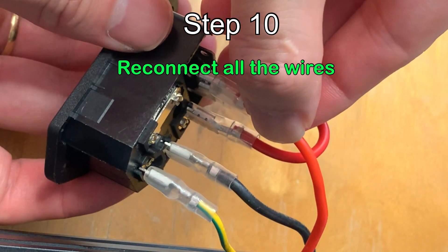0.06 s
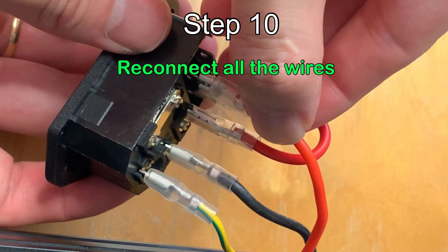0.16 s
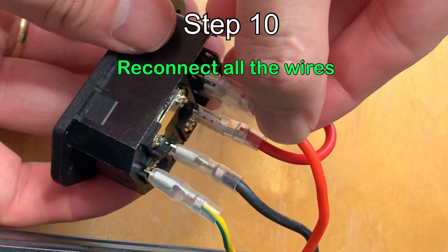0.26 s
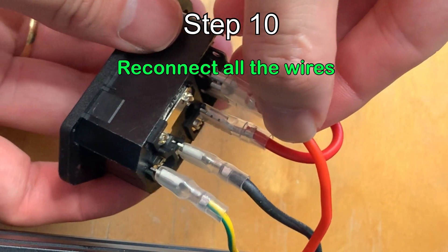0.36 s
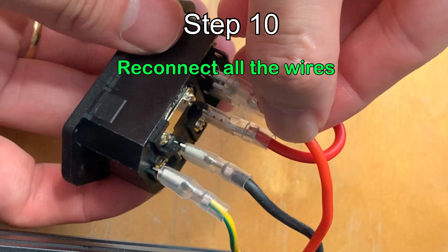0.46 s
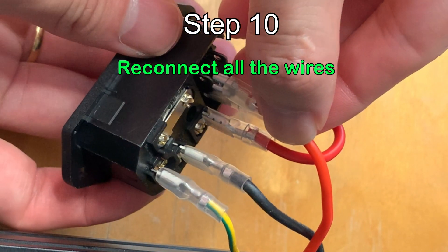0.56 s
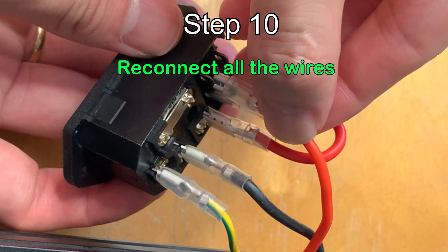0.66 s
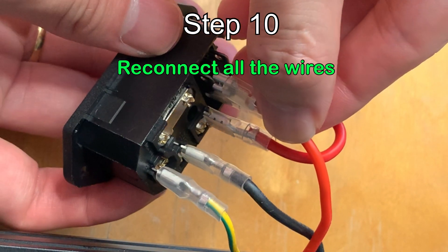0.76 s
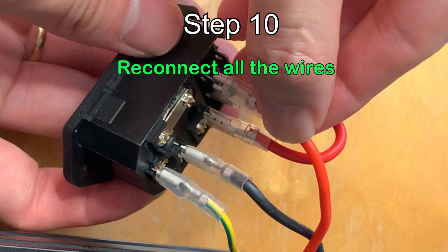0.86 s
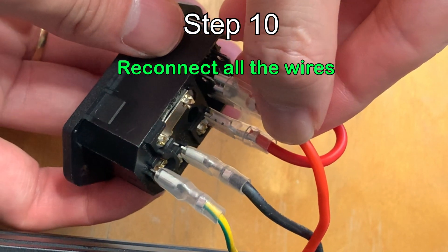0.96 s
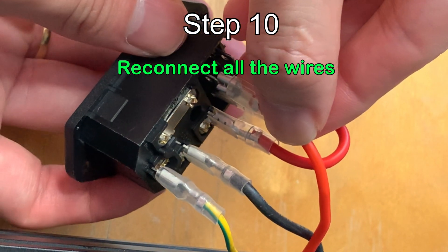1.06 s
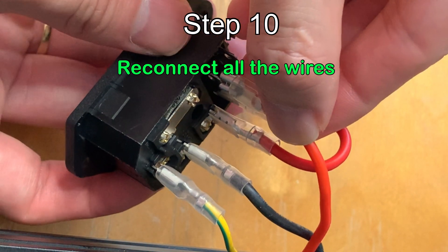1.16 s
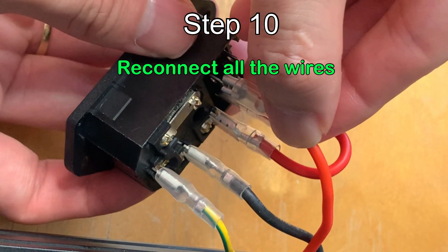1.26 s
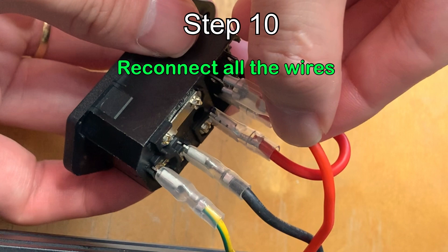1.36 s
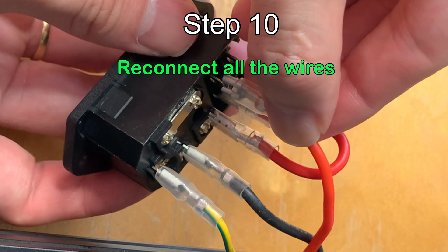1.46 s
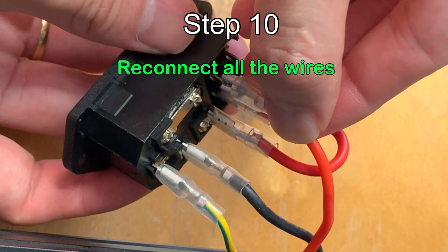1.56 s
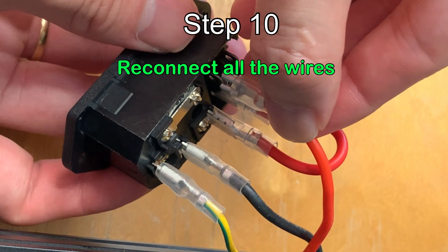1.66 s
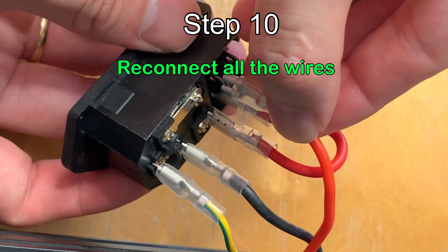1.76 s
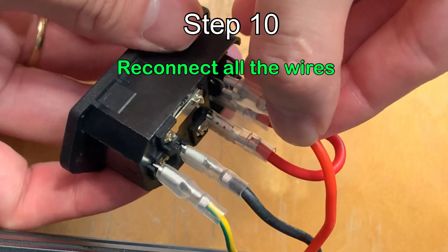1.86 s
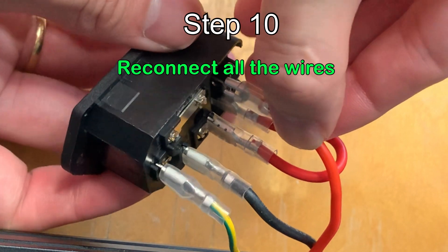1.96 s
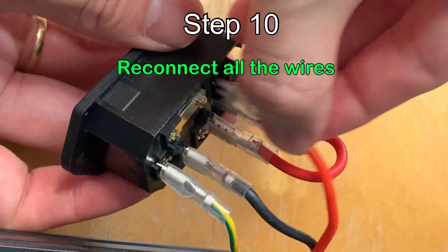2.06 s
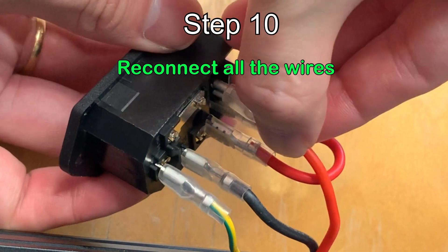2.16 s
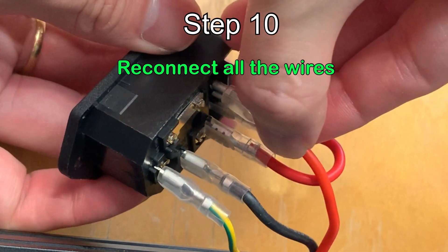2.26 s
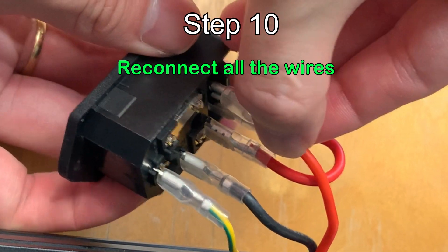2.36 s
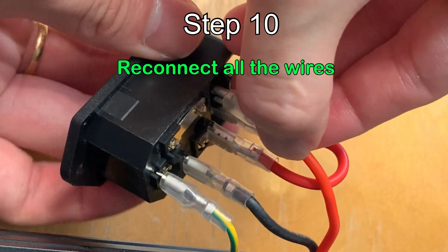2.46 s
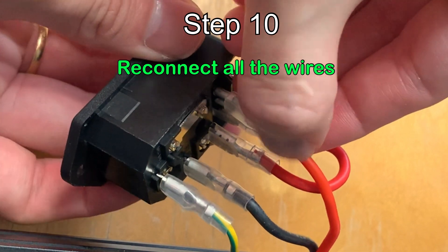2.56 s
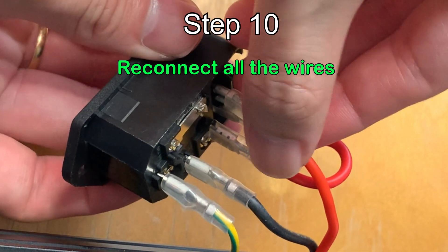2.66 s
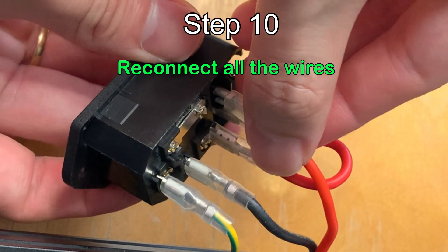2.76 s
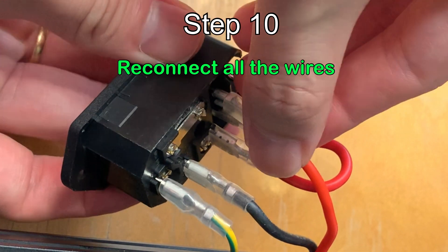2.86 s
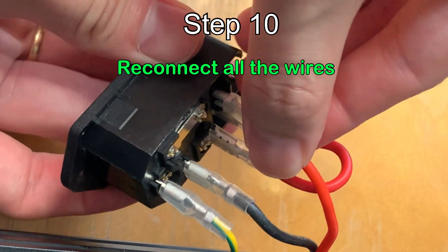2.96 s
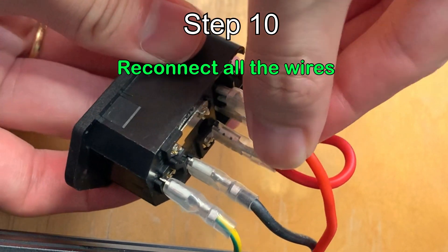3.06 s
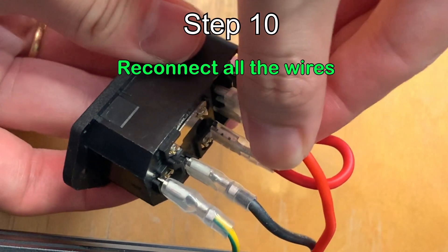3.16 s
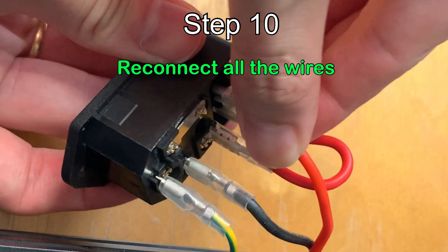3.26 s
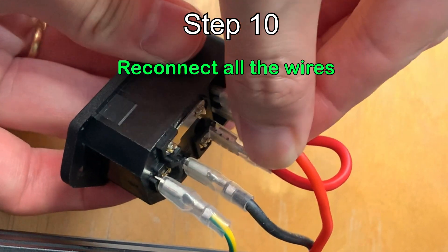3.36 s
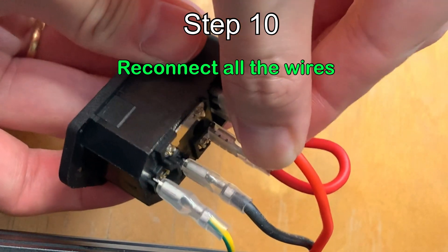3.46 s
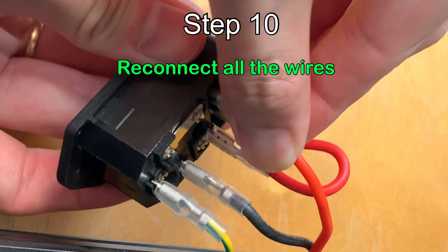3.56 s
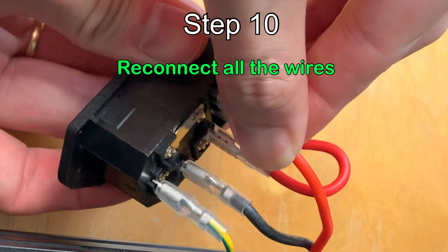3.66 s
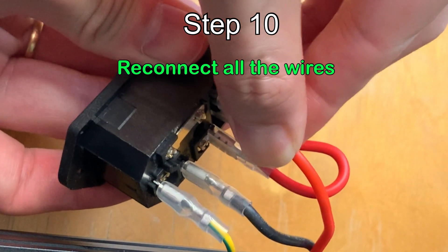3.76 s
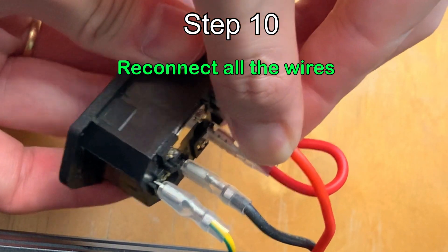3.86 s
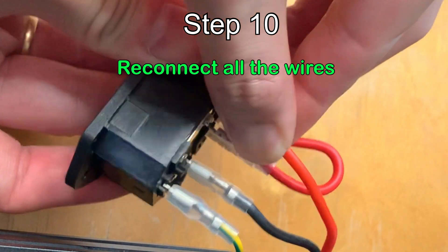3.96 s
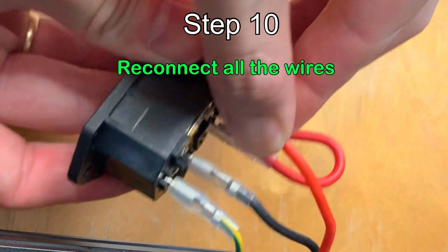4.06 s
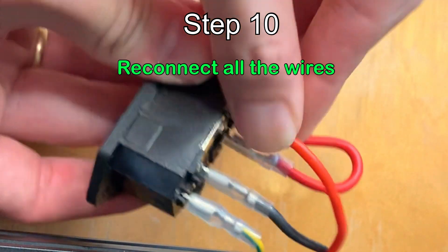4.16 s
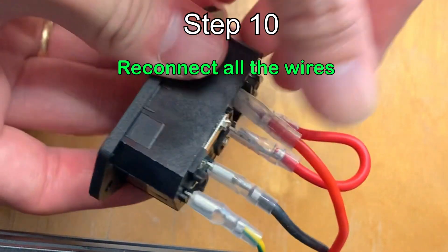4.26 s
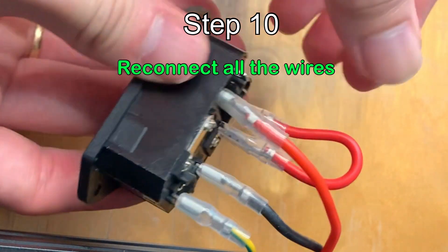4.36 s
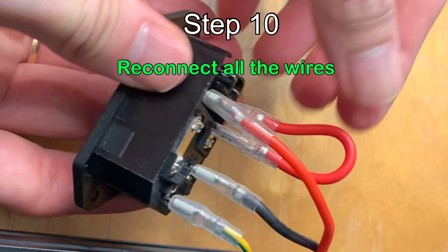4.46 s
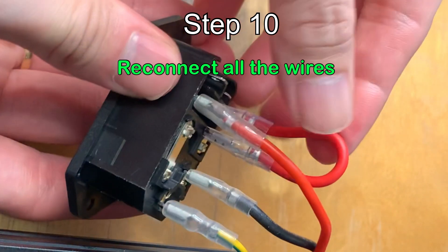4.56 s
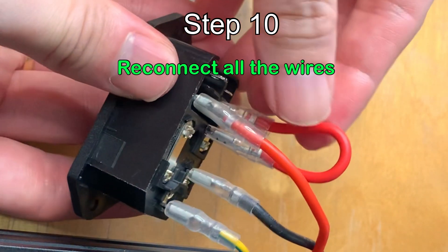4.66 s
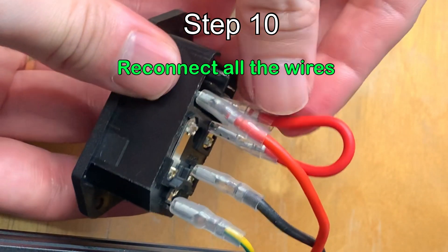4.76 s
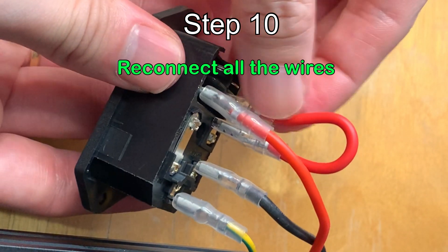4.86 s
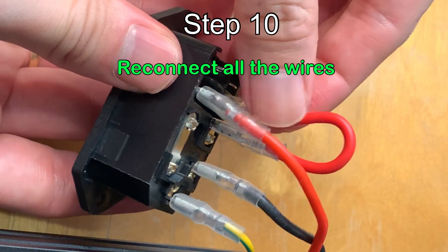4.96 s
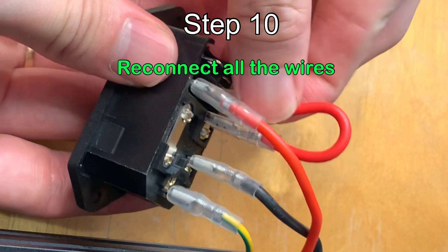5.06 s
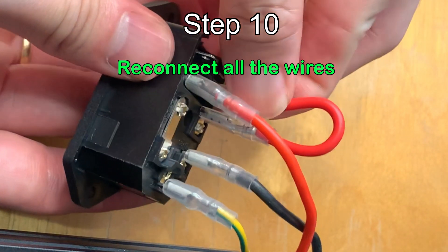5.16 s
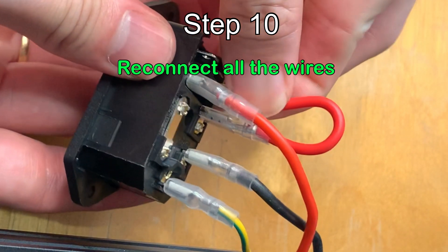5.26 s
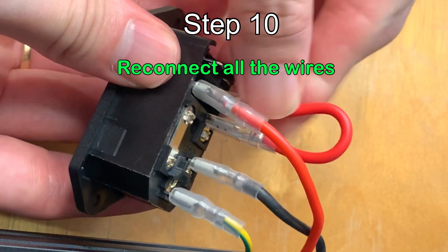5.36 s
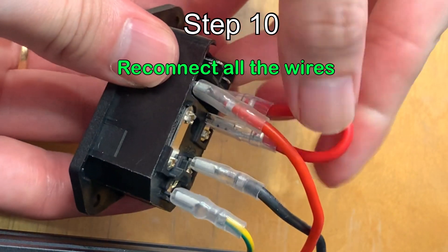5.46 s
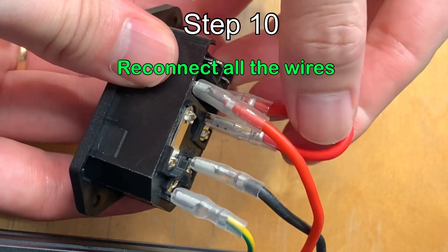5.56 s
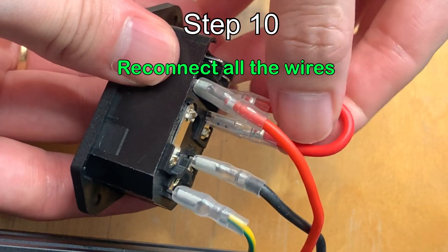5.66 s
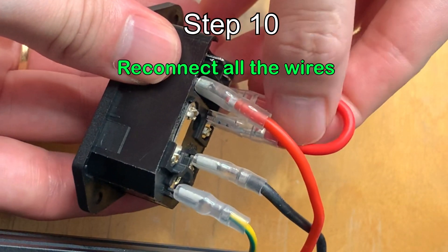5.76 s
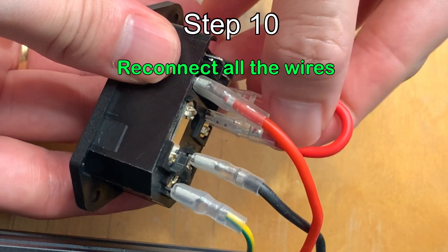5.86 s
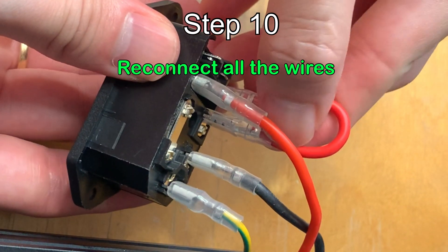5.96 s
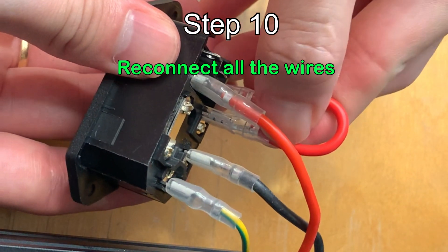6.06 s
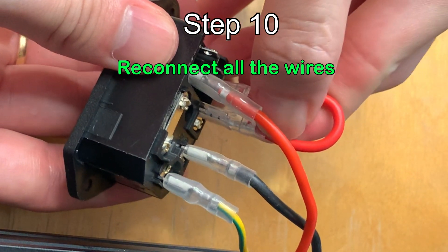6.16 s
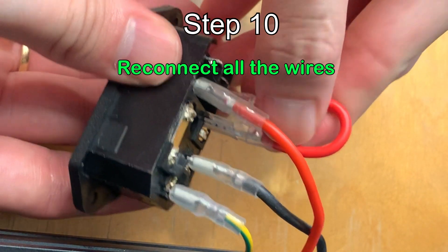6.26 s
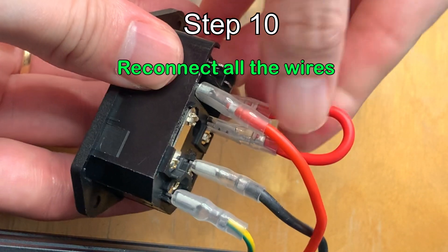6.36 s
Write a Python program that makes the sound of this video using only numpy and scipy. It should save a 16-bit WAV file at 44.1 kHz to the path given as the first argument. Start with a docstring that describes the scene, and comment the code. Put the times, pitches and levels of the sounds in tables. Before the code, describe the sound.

Close stereo microphone, small indoor room with a short tail. Low motor hum and a faint thin whine continue unchanged throughout. Against them, tiny metallic ticks and soft plastic wire taps are sparse and quiet until a connector slips home with a single crisp crack, far louder than everything else, rattling briefly. Light rubbing and a small cluster of wire clicks follow, then near stillness with a last faint tap.

```python
"""In a small, dry room, fingers work a spade connector onto the terminal of a plastic mains socket, up close.
Brass scrapes are bursts of filtered noise; ticks and the quick slips of the snap ring tuned brass modes.
Sleeved wires are nudged and knock as damped tones, and the socket body rings along with slips and knocks.
A fan hums steadily on multiples of its shaft speed, with a second motor, a faint whine and soft moving air."""
import sys
import numpy as np
from scipy import signal
from scipy.fft import rfft, irfft
from scipy.io import wavfile
from scipy.ndimage import uniform_filter1d

SR = 44100
rng = np.random.default_rng(int(sys.argv[2]) if len(sys.argv) > 2 else 0)


def unload_audio(sound):
    """Save the sound as a 16-bit wav file, at the path given as the first command line argument."""
    columns = np.transpose(np.atleast_2d(sound))
    # keep every value between -1 and 1, then stretch to whole-number steps
    steps = np.round(np.clip(columns, -1, 1) * 32767)
    wavfile.write(sys.argv[1], SR, steps.astype(np.int16))


N = 281799
TIME = np.arange(N) / SR
FREQ = np.maximum(np.arange(N // 2 + 1) * SR / N, 1)

# brass modes as the connector grips the terminal: pitch_hz, width_hz, level_db (relative spectral peak)
GRIPPED_SPADE = [(1760, 300, -2.5), (2060, 240, -8), (2670, 420, -9), (3780, 350, -6), (4250, 340, -0.5),
                 (5840, 460, -10.5), (6854, 510, -2.5), (7410, 380, -1.5), (7970, 310, 0), (9550, 560, 0),
                 (11200, 1200, -3), (12050, 1200, -3.5), (14400, 1100, -9.5)]
# the connector bottoms out and thumps the socket; the chatter starts from here
SEAT_S, SEAT_DB = 3.8820, -9.5


def undb(db):
    """Decibels to gain."""
    return 10 ** (np.asarray(db) / 20)


def shape(x, gain):
    """Filter by a gain for every frequency."""
    return irfft(rfft(x) * gain, N)


def colour(points):
    """Gain along (Hz, dB) points, straight in dB over log frequency."""
    hz, db = np.transpose(points)
    return undb(np.interp(np.log(FREQ), np.log(hz), db))


def bell(f, hz, octaves):
    """Bell-shaped gain around a centre pitch."""
    return np.exp(-.5 * (np.log2(f / hz) / octaves) ** 2)


def focus(x, hz, octaves):
    """Keep a bell-shaped band of a short sound."""
    f = np.maximum(np.arange(len(x) // 2 + 1) * SR / len(x), 1)
    return irfft(rfft(x) * bell(f, hz, octaves), len(x))


def decay(t, t60):
    """Exponential fade that falls 60 dB in t60 seconds."""
    return np.exp(-np.log(1000) * t / t60)


def add(track, s, x):
    """Mix a short sound in at time s."""
    i = int(round(s * SR))
    track[i:i + len(x)] += x[:N - i]


def walk(rate):
    """Smooth random wander with new targets at rate per second, spread near 1."""
    knots = rng.standard_normal(int(TIME[-1] * rate) + 2)
    path = np.interp(TIME * rate, np.arange(len(knots)), knots)
    return 1.3 * uniform_filter1d(path, int(SR / rate / 2))


def connector(snap_jolt_db=-12, tick_jolt_db=9):
    """The snap, the sleeve's chatter and the lighter ticks ring brass and socket, leaning between the ports."""
    # contacts of the snap, from the spring's release to the last light slip before the connector bottoms out:
    # start_s, level_db (dry rms over a millisecond), centre_hz, spread_octaves, judder_s
    snap = [(3.8752, -26.5, 6000, 1.8, 0.0007), (3.8763, -5, 7000, 1.5, .0008),
            (3.8781, -18.5, 8500, 1.6, 0.00084), (3.8792, -26, 3000, 1.7, 0.0005),
            (3.8806, -25, 6000, 1.6, 0.0013)]
    # single ticks of brass slipping on brass, same columns
    ticks = [(1.8714, -44, 7000, 0.61, 0.0017), (1.8745, -58, 7500, 1.1, .0012),
             (1.9922, -64, 7450, .8, 0.0023), (2.003, -54, 7000, .5, 0.004),
             (2.0098, -51, 6200, 0.61, .0018), (2.301, -65.5, 11000, 0.77, 0.0025),
             (2.9340, -47.5, 6700, 0.54, 0.0022), (3.350, -60, 3770, 0.6, .002),
             (4.101, -56, 12100, 2.1, .0008), (4.148, -55, 3274, 0.9, .002),
             (5.2957, -56, 11040, 1.6, .002), (5.3305, -56, 9940, 0.13, .004),
             (5.406, -59.5, 4850, 0.26, .004), (5.8342, -53, 8400, 0.22, .0035),
             (6.066, -67, 8370, 0.21, 0.0026)]
    # brass modes when only lightly touched: pitch_hz, width_hz, level_db (relative spectral peak)
    loose_spade = [(1300, 600, 1.5), (2880, 160, -0.5), (4300, 690, 2), (5840, 220, 0.5), (6800, 460, -1.5),
                   (7800, 400, -9.5), (9240, 600, 4), (11600, 930, -6), (15000, 900, -2.5)]
    # the connector sits nearer the right port: pitch_hz, right_minus_left_db
    connector_lean = [(600, -1.5), (1300, 3.5), (2400, 5), (4400, -2.5), (8000, 1.6)]
    brass = slips(snap, GRIPPED_SPADE) + chatter() + slips(ticks, loose_spade, detune=.025)
    seat = socket([(SEAT_S, SEAT_DB)])
    body = undb(snap_jolt_db) * socket(snap) + seat + undb(tick_jolt_db) * socket(ticks)
    lean = np.sqrt(colour(connector_lean))  # half the difference on each port
    return shape(room(brass + body, wet_db=-4.0), np.array([1 / lean, lean]))


def chatter(count=9):
    """Shaken by the snap, the loose sleeve taps the brass at uneven gaps, on the whole ever more lightly."""
    gap_s, judder_s, centre_hz, octaves = .01, .0015, 2980, 0.96
    level_db, fall_db_per_s, scatter_db = -38.5, 191.5, 3.5
    gap, strength, tone = rng.uniform(-1, 1, (count, 3)).T
    after = np.cumsum(gap_s * 2 ** gap)  # each gap from half to twice as long
    db = level_db - fall_db_per_s * after + scatter_db * strength
    pitches = centre_hz * 2 ** (tone / 2)
    taps = [(SEAT_S + s, tap_db, hz, octaves, judder_s) for s, tap_db, hz in zip(after, db, pitches)]
    return slips(taps, GRIPPED_SPADE, detune=0.084)


def slips(events, modes, detune=.005, size=2048):
    """Each slip judders briefly and rings the brass; its centre picks the modes, and chance detunes them."""
    lead = size // 8  # room ahead of the slip for the filters' spill
    t = np.arange(size) / SR
    out = np.zeros(N)
    for s, db, hz, octaves, judder_s in events:
        shifts = 1 + detune * rng.standard_normal(len(modes))
        ring = np.zeros(size)
        for k, (mode_hz, width, mode_db) in enumerate(modes):
            mode = np.exp(-np.pi * width * t) * np.sin(2 * np.pi * mode_hz * shifts[k] * t)
            ring += undb(mode_db) * width * mode * (-1) ** k
        stroke = np.sin(np.pi * np.clip((t - lead / SR) / judder_s, 0, 1))
        # phases alone: all pitches alike, scattered in time
        judder = np.exp(1j * np.angle(rfft(stroke * rng.standard_normal(size))))
        click = focus(irfft(rfft(ring) * judder), hz, octaves)
        click *= np.sqrt(SR / 1000) / np.linalg.norm(click)  # unit rms over a millisecond
        add(out, s - lead / SR, undb(db) * click)
    return out


def socket(jolts, size=4096):
    """A slip or knock also jolts the plastic body that holds the terminal, which rings in damped modes."""
    # modes of the plastic: pitch_hz, t60_s, level_db (before any jolt gain)
    plastic = [(275, 0.06, -38), (400, .04, -41.5), (591.6, 0.035, -35.5), (743, 0.03, -31),
               (970, 0.028, -26.5), (1120, .025, -34), (1400, 0.03, -27), (1560, .02, -29),
               (1800, 0.014, -24.5)]
    t, out = np.arange(size) / SR, np.zeros(N)
    ring = sum(undb(db) * np.sin(2 * np.pi * hz * t) * decay(t, t60) for hz, t60, db in plastic)
    for s, db, *_ in jolts:
        add(out, s, undb(db) * ring)
    return out


def wires(jolt_db=10.5):
    """Sleeved wires knock on each other, and every knock also jolts the socket."""
    # start_s, level_db (dry ring), pitch_hz, t60_s
    wire_knocks = [(.344, -54.5, 935, 0.031), (0.37, -56, 900, 0.048), (1.156, -51.5, 970, 0.032),
                   (1.8684, -53, 2950, 0.018), (4.397, -58, 2660, .006), (4.4605, -48, 2275, 0.0078),
                   (4.462, -58, 4124, 0.026), (5.246, -57, 4030, 0.014), (5.2964, -42.5, 2470, 0.02),
                   (5.297, -47, 1582, 0.008), (5.309, -56, 2760, 0.016), (5.3303, -38.5, 1787, 0.03),
                   (6.178, -54.5, 3750, 0.012), (6.235, -54, 2000, 0.011)]
    return room(knocks(wire_knocks) + undb(jolt_db) * socket(wire_knocks), wet_db=-5.0)


def knocks(events, crack_db=-11, crack_t60=0.014, crack_octaves=0.71,
           overtone=1.7, overtone_db=-16, size=4096):
    """Soft plastic: a quickly damped ring with one overtone, and a dull crack."""
    t, out = np.arange(size) / SR, np.zeros(N)
    for s, db, hz, t60 in events:
        phase = 2 * np.pi * hz * t
        ring = (np.sin(phase) + undb(overtone_db) * np.sin(overtone * phase)) * decay(t, t60)
        crack = focus(rng.standard_normal(size), hz, crack_octaves)
        crack *= decay(t, crack_t60) / crack.std()
        contact = 1 - np.exp(-t * hz)  # a soft blow takes about one cycle to build
        add(out, s, undb(db) * contact * (ring + undb(crack_db) * crack))
    return out


def rubbing(drag_hz=7000, drag_octaves=0.97):
    """Brass drags along the terminal, and fingers rub and squeak on the sleeves."""
    # brass drags: strongest_s, spread_s (of the swell), level_db (dry rms at the strongest moment)
    drags = [(1.938, .006, -78), (1.972, .005, -72), (2.004, 0.01, -67), (2.904, 0.039, -79.5),
             (4.149, 0.008, -71.5), (4.757, .027, -76), (5.320, 0.0068, -66), (6.195, 0.022, -81)]
    # finger rubs: the same three, then centre_hz, spread_octaves
    finger_rubs = [(.37, .03, -82, 1380, 0.29), (1.875, .005, -68.5, 1000, 0.88),
                   (2.005, 0.021, -73, 2500, 0.8), (2.935, 0.013, -68, 1800, 0.97),
                   (3.3, .07, -80, 850, .5), (3.8, 0.041, -75, 800, .5), (4.428, 0.014, -67.5, 3740, 0.023),
                   (4.47, 0.014, -70, 2900, 0.45), (4.5, .08, -70.5, 850, 0.65),
                   (4.95, 0.17, -72.5, 850, 0.65), (5.248, .012, -76, 2700, .5),
                   (5.3, .005, -65.5, 750, 0.74), (5.322, 0.0045, -64.5, 2000, 1.1),
                   (5.337, 0.0069, -68, 3300, .4), (5.462, 0.043, -69.5, 1920, 0.19),
                   (5.44, 0.09, -77.5, 2797, 0.73), (5.705, 0.063, -78.5, 3090, 0.052),
                   (5.985, 0.023, -78, 2900, .6), (6.215, 0.044, -73, 2680, 0.57)]
    brass = scrapes([(*drag, drag_hz, drag_octaves) for drag in drags], grain_db=3.0)
    fingers = scrapes(finger_rubs, grain_db=4.0)
    return room(brass + fingers, wet_db=-1.0)


def scrapes(events, grain_db, size=30720):
    """Friction: a swell of tiny uneven catches."""
    t, out = (np.arange(size) - size // 2) / SR, np.zeros(N)
    for s, spread_s, db, hz, octaves in events:
        force = np.minimum(rng.exponential(size=size), 4)
        caught = rng.random(size) < .25  # about a quarter of the samples catch
        catches = rng.standard_normal(size) * undb(grain_db * force) * caught
        rub = focus(catches, hz, octaves)
        swell = np.exp(-.5 * (t / spread_s) ** 2)
        add(out, s + t[0], undb(db) * rub / rub.std() * swell)
    return out


def fan(shaft_hz=58.04):
    """The fan's hum: tones on multiples of its shaft speed."""
    # multiple, level_db (rms ahead of the ports), unsteady_share (0-1), left_lead_rad (ahead of the ports)
    fan_tones = [(1, -61, .6, 0.033), (3, -44.5, .05, 0.1), (6, -76.5, .5, 1.6), (19, -81.5, 0.6, 2),
                 (20, -73, 0.75, 1.4), (21, -88.5, 0.7, 1.4), (23, -86.5, 0.7, 1), (28, -86.5, 0.5, 0.64),
                 (30, -81, 0.1, 1.525), (53, -92.5, 0.99, 0.27), (55, -88.5, 1, 0.77)]
    return rotor(shaft_hz, fan_tones)


def second_motor(motor_hz=118.5):
    """A second small motor: tones on multiples of its own steady speed."""
    # multiple, level_db (rms ahead of the ports), unsteady_share (0-1), left_lead_rad (ahead of the ports)
    motor_tones = [(1, -62, 0.54, 0.021), (2, -63.5, 0.54, 0.18), (3, -75, 0.42, 0.27), (4, -73, 0.6, .4)]
    return rotor(motor_hz, motor_tones)


def whine(whine_hz=3147.2):
    """A thin, faint whine: one tone of steady pitch whose strength and phase waver."""
    # multiple, level_db (rms ahead of the ports), unsteady_share (0-1), left_lead_rad (ahead of the ports)
    whine_tones = [(1, -86.5, .7, 0.54)]
    return rotor(whine_hz, whine_tones)


def rotor(hz, tones, flutter_rate=20):
    """Lines on multiples of a steady shaft; eddies unsettle their strength and phase."""
    out = np.zeros((2, N))
    for multiple, db, share, lead in tones:
        flutter = walk(flutter_rate) + 1j * walk(flutter_rate)
        sway = np.sqrt(2 - 2 * share ** 2) + share * flutter
        tone = undb(db) * sway * np.exp(2j * np.pi * (multiple * hz * TIME + rng.random()))
        out += np.array([tone.real, (tone * np.exp(-1j * lead)).real])
    return out


def air(waver_db=0.33, eddy_db=1.36, eddy_rate=6, eddy_octaves=0.31):
    """The soft rush of the fan's air: shaped noise whose middle bands waver separately."""
    # spectrum of the moving air: pitch_hz, level_db (per Hz, ahead of wavering and ports)
    air_spectrum = [(22, -90.5), (32, -88), (52, -74.5), (140, -74.5), (205, -85.5), (270, -78.5),
                    (330, -89.5), (450, -89.5), (800, -99), (1600, -102.5), (2200, -112), (2700, -114),
                    (3100, -112), (3400, -116), (4000, -116.5), (6600, -120.5), (9200, -122), (11500, -124),
                    (15500, -134)]
    # centres of the wavering bands: centre_hz
    eddy_centres = [400, 800, 1600]
    rush = shape(diffuse(), colour(air_spectrum)) * np.sqrt(SR / 2)
    eddies = np.zeros((2, N))
    for hz in eddy_centres:
        band = shape(rush, bell(FREQ, hz, eddy_octaves))
        eddies += band * (undb(eddy_db * walk(eddy_rate)) - 1)
    return (rush + eddies) * undb(waver_db * walk(1.6))


def room(x, wet_db, room_t60=0.275, near_t60=0.23, near_db=-13, build_s=0.002):
    """Hands and bench scatter the sound at once; the walls answer with a short tail of bunched echoes."""
    # colour of the walls' answer: pitch_hz, level_db (relative)
    wall_colour = [(200, -4), (700, -5), (1800, -6.5), (3000, -6.5), (3750, -2.5), (4300, -9), (5400, -2),
                   (7200, -9.5), (9000, -8.5), (11300, -12), (14500, -11)]
    t = TIME[:SR // 2]
    bunches = undb(2.5 * walk(600))[:len(t)]
    far = decay(t, room_t60) * (1 - np.exp(-t / build_s)) * bunches
    near = decay(t, near_t60) * (1 - np.exp(-t * 2000))  # builds with a half-millisecond time constant
    walls = shape(diffuse(), colour(wall_colour))[:, :len(t)] * far / np.linalg.norm(far)
    hands = diffuse()[:, :len(t)] * near / np.linalg.norm(near)
    echoes = signal.fftconvolve(x[None], walls + undb(near_db) * hands, axes=1)[:, :N]
    return x + undb(wet_db) * echoes


def diffuse():
    """Stereo noise arriving from all round: independent mid and side, with a side share set by pitch."""
    # stereo width: pitch_hz, side_minus_mid_db
    side_balance = [(60, -23.5), (180, -15.5), (400, -4.5), (800, 1), (2200, -3.5), (4500, -24.5),
                    (16000, -15.5)]
    mid, side = rng.standard_normal((2, N))
    width = colour(side_balance)
    side = shape(side, width)
    return shape(np.array([mid + side, mid - side]), 1 / np.sqrt(1 + width ** 2))


def scene():
    """The handiwork in its room, over the hum."""
    handiwork = connector() + wires() + rubbing()
    hum = fan() + second_motor() + whine() + air()
    return handiwork + hum


def record(dry, top_hz=15900, ceiling=.66):
    """Two ports differ in colour, the treble reaches the right one late; peaks are rounded, the top is cut."""
    # the right port hears the middle range a little better: pitch_hz, right_minus_left_db
    port_lean = [(100, 0), (175, 1.4), (300, 2.5), (600, 2.2), (1500, 1.5), (2600, 0.5), (4200, -0.5)]
    # phase between the two microphone ports: pitch_hz, left_lead_rad
    port_phase = [(0, 0), (1900, .1), (3600, 1.5), (4700, 3.2), (9050, 9.4), (13300, 15.7), (16000, 19.4)]
    lean = np.sqrt(colour(port_lean))
    lag = np.interp(FREQ, *np.transpose(port_phase))
    left = shape(dry[0], 1 / lean)
    right = shape(dry[1], lean * np.exp(-1j * lag))
    ports = np.array([left, right])
    rounded = ports / (1 + (ports / ceiling) ** 8) ** (1 / 8)
    low_pass = signal.ellip(8, .2, 70, top_hz, fs=SR, output="sos")
    return signal.sosfilt(low_pass, rounded)


dry = scene()
out = record(dry)
unload_audio(out)
```